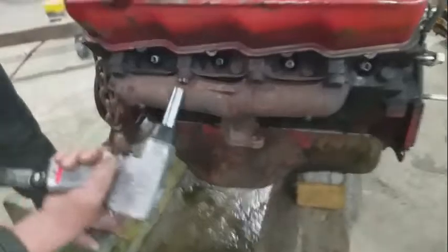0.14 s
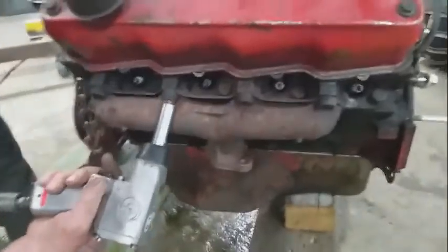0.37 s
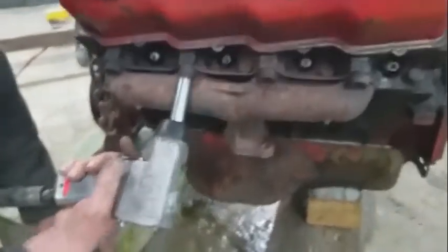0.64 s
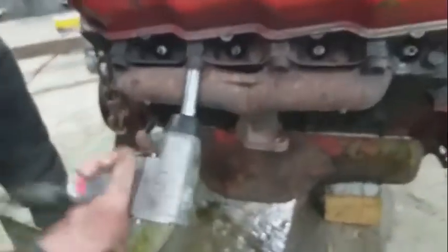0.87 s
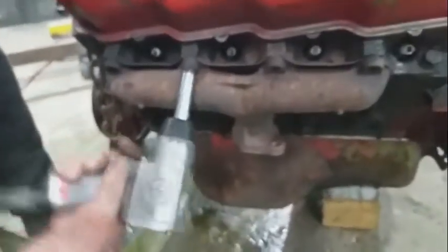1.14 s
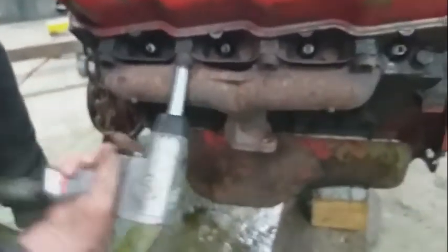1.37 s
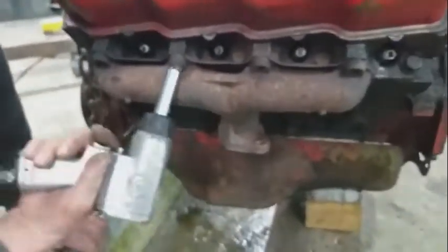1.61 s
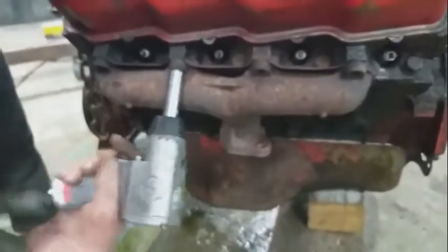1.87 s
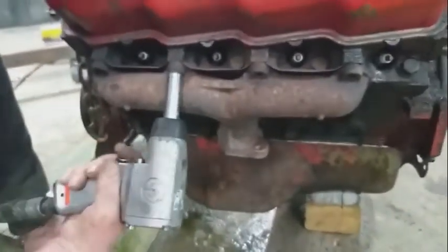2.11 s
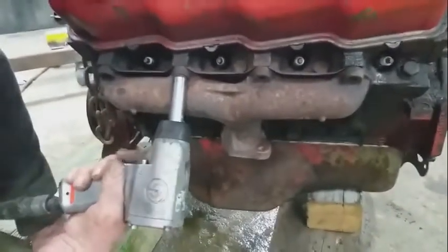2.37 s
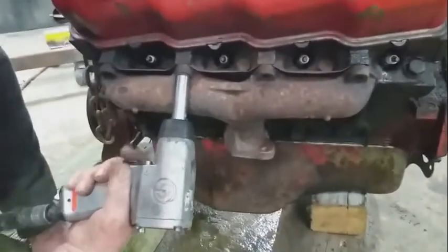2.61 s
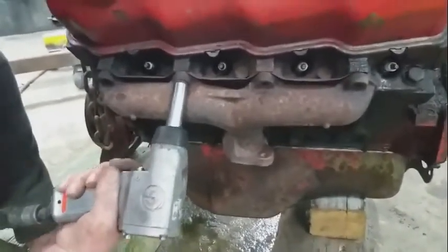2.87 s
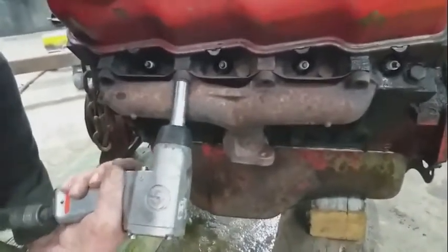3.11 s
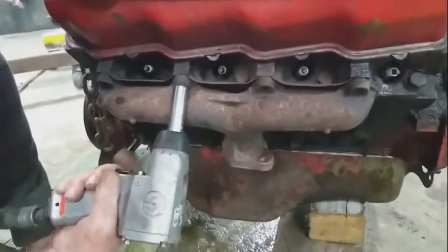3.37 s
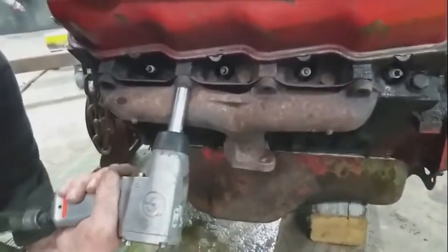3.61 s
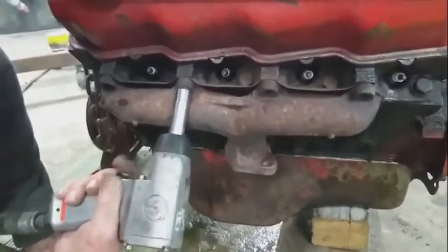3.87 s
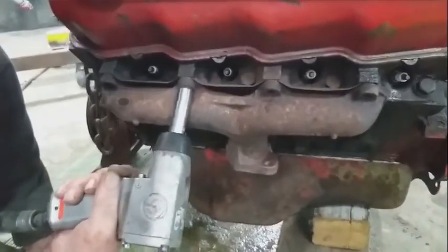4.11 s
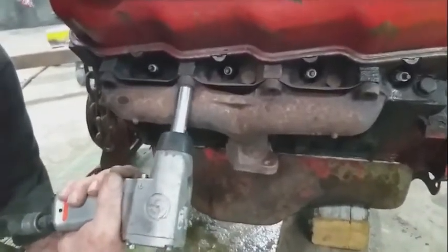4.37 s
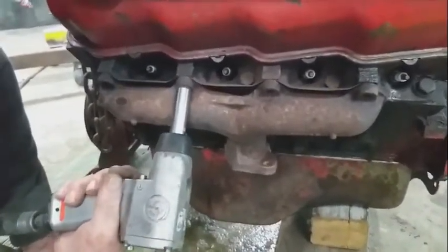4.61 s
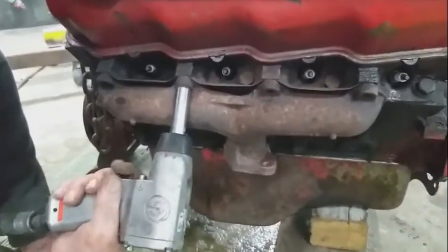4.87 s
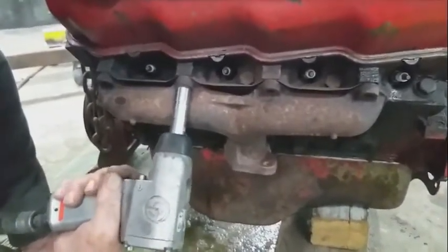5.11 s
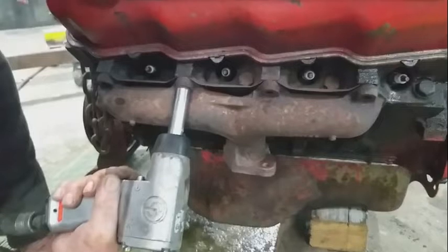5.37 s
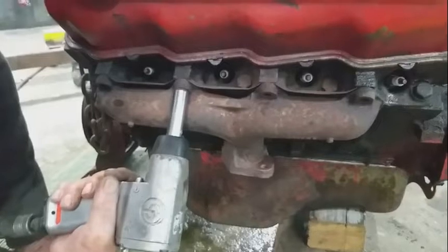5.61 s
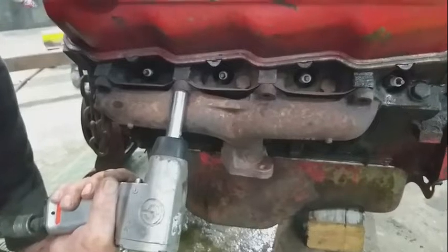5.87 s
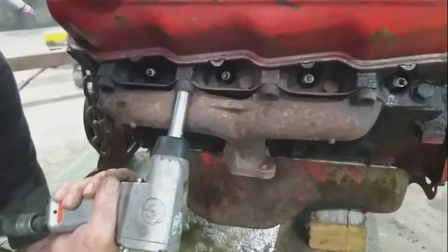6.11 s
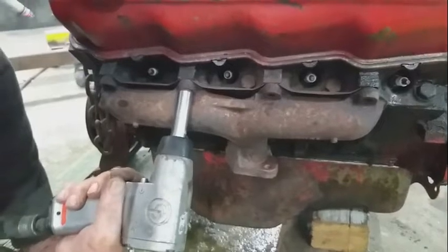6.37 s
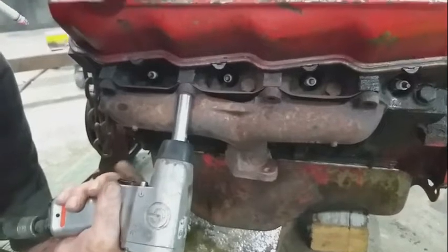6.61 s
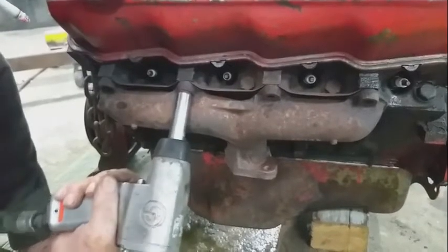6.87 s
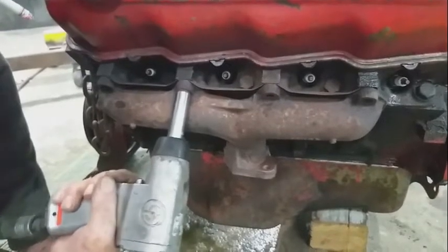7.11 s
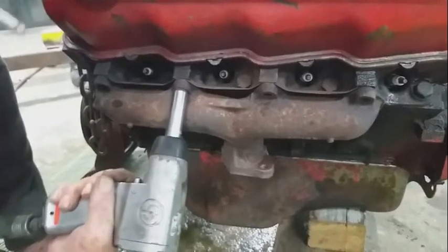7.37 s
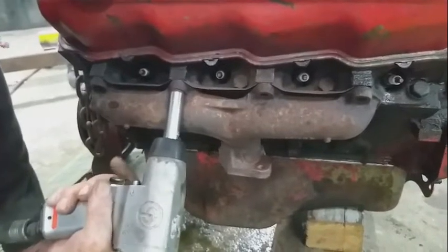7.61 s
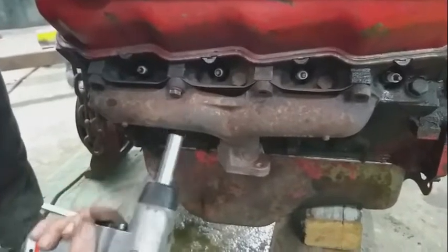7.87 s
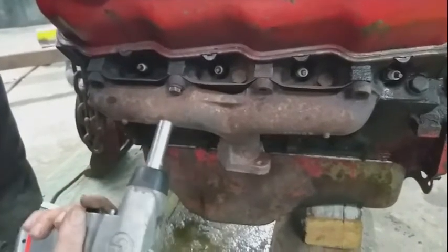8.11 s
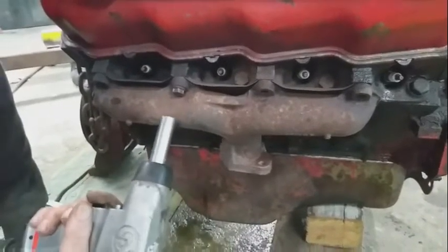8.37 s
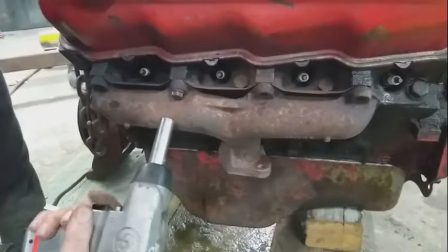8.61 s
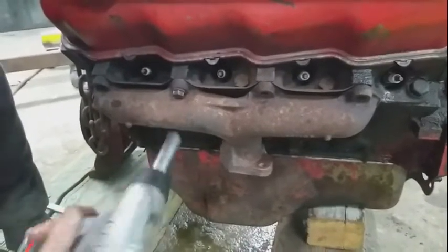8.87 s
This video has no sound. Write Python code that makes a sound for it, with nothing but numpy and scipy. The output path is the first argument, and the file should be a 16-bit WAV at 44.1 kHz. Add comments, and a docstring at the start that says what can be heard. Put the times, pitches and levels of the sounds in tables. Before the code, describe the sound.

Close to an engine block in a workshop, with narrow stereo and slight room echo, a faint leaking-air hiss runs throughout, gradually sinking and rising again at the end. From 0 to 1.2 seconds a steel socket knocks and scrapes grittily on iron, with faint hollow taps; another sharp clack comes at 1.8. A pneumatic impact wrench then fires six bursts: 2.4-2.7, 2.9-3.3, 3.5-3.9, 4.1-4.8, 5.0-6.5 and 6.75-7.55 seconds. Each is a bright roar of exhaust air with rapid, slightly uneven hammering, about twenty to thirty blows per second, thudding into iron and rattling ringing steel. Single socket clacks mark the pauses, including 3.4, 4.0, 4.8, 6.5 and 7.6. A light scrape follows at 7.8, then the unloaded motor flutters roughly from 8.1 to 8.6. A quiet dull scrape at 8.75 closes it near 9 seconds.

```python
"""An air impact wrench hammers in bursts on a seized bolt of an engine block in a workshop.
First the socket knocks and scrapes on the iron amid faint hollow taps; the level of a background hiss shifts.
Six trigger pulls follow: exhaust air roars, and each blow thuds into the iron and rattles the socket.
Socket knocks fall between pulls; then the unloaded motor creeps round, and a last dull scrape ends it.
Shaped noise makes the air; random grains drive ringing resonances for the steel, iron and housing."""
import sys
import numpy as np
from scipy import signal
from scipy.fft import rfft, irfft
from scipy.io import wavfile

SR = 44100
rng = np.random.default_rng(int(sys.argv[2]) if len(sys.argv) > 2 else 0)


def invert_db(x):
    """Field ratio 10**(x/20) for x, a level in decibels (scalar or array-like)."""
    u = np.asarray(x, float) / 20
    return 10 ** u


def waveform_to_disk(signal):
    """Save audio, clipped to [-1, 1], as 16-bit WAV at the path in sys.argv[1]."""
    frames = np.transpose(np.atleast_2d(signal))
    scaled = np.clip(frames, -1, 1) * 32767
    samples = np.round(scaled).astype(np.int16)
    wavfile.write(sys.argv[1], SR, samples)


N = 396459

# colour of the background hiss, like leaking air: (frequency [Hz], relative density [dB])
HISS_SPECTRUM = [(24, -60.5), (40, -33.5), (109, -10), (162, -12), (200, -19), (500, -28.5), (2100, -26),
                 (2930, -5), (3850, -16.5), (4370, -12), (4830, -18), (5330, -16.5), (7200, -16.5),
                 (9010, -6), (10500, -25), (15600, -11.5)]
# slow course of the background hiss as heard: (time [s], level [dB])
HISS_LEVEL = [(0, -44.5), (.6, -47.5), (1.2, -49.5), (1.7, -46), (2.1, -50), (2.9, -53), (5, -53.5),
              (6.7, -57.5), (8.65, -60.5), (8.8, -56), (8.99, -48.5)]
# how long the workshop rings: (frequency [Hz], time to fall by 60 dB [s])
SHOP_T60 = [(100, 0.29), (700, 0.51), (5000, 0.46), (13000, 0.32)]
# faint hollow taps: (time [s], relative level [dB])
TAPS = [(0.201, -21), (0.649, -37.5), (1.165, -44), (1.372, -59), (1.5, -58), (1.742, -45), (1.982, -48)]
# strokes of sliding and shuffling, each a curve: (time [s], relative level [dB], brightness [0-1])
SCRAPE_STROKES = [
    [(0, -57, 0.7), (.17, -63, 0.7), (.2, -44, 0.7), (.33, -37, 0.77), (.45, -36.5, 0.87), (.55, -52, .55),
     (.73, -57, 1)],
    [(.74, -38.5, 0.7), (.8, -46, 0.4), (.86, -38.5, 0.7), (.95, -40, 0.9), (1.05, -47.5, 0.6),
     (1.25, -77, .45)],
    [(2.28, -83, .45), (2.3, -48.5, 0.44), (2.44, -55, 0)],
    [(7.81, -68.5, 0.4), (7.825, -51.5, 0.97), (7.9, -60.5, 0.86), (8.1, -61, 0.3)],
    [(8.745, -72, 0.07), (8.762, -56, 0), (8.88, -58.5, 0.09), (8.99, -69, 0.2)],
]
# colour of dull sliding: (frequency [Hz], relative density [dB])
DULL_SCRAPE = [(120, -43), (200, -13), (488, -8.5), (572, -6.5), (660, -4), (2010, -11), (4910, -31),
               (9000, -11.5), (11700, -51.5), (19800, -120)]
# colour of bright sliding: (frequency [Hz], relative density [dB])
BRIGHT_SCRAPE = [(59, -48.5), (100, -10.5), (224, -15), (513, -23.5), (634, 0.5), (910, -17.5), (1870, 0),
                 (2630, -5.5), (8110, -10.5), (16000, -29)]
# resonances of the cast iron under a scrape: (frequency [Hz], width [Hz], relative level [dB])
IRON_MODES = [(653, 40, -3), (1060, 68, -11.5), (1314, 18, -0.5), (1540, 33, -4), (1877, 160, -4),
              (2250, 31, -6)]
# swell and fade of the unloaded motor: (time [s], relative level [dB])
CREEP_LEVEL = [(8.07, -61), (8.12, -45), (8.17, -35), (8.3, -35), (8.44, -36), (8.5, -41.5), (8.58, -48),
               (8.62, -68)]
# harder catches of the creeping motor: (time [s], relative level [dB])
CATCHES = [(8.1274, -36), (8.153, -30), (8.2018, -23.5), (8.2741, -29), (8.338, -28), (8.4002, -26.5),
           (8.4658, -31), (8.537, -28), (8.5744, -36)]
# resonances of the tool housing: (frequency [Hz], width [Hz], relative level [dB])
HOUSING_MODES = [(346.3, 80, -0.5), (1343, 120, -6.5), (2370, 166, -6), (3770, 69, -9), (4320, 83, -8),
                 (5600, 99, -21), (6200, 42, -9), (6760, 33, -8), (7600, 70, -13)]
# loose socket knocks:
# (time [s], relative level [dB], middle [dB to drive], thump [dB to drive], 60 dB die-away [s])
KNOCKS = [(0.184, -3.5, -29, -62, 0.021), (0.195, -7.5, -23.5, -60, 0.041), (0.333, -5, -16, -46, 0.033),
          (0.403, -10, -18, -46, 0.021), (0.637, -25.5, -35, -45, 0.082), (0.739, -25.5, -9, -38, 0.025),
          (1.775, -5, -23, -34.5, 0.064), (3.357, -8, -19, -45, 0.04), (3.962, -8.5, -19.5, -51, 0.03),
          (4.79, -15.5, -30.5, -46, 0.037), (6.497, -2.5, -22.5, -47, 0.026),
          (7.611, -4.5, -24, -51, 0.027)]
# resonances of socket, anvil and housing: (frequency [Hz], width [Hz], relative level [dB])
STEEL_MODES = [(3300, 93, -8), (3536, 95, -8.5), (4100, 46, 5), (4493, 63, 1), (5110, 86, -12),
               (5480, 29, 6.5), (5935, 26, 3), (6260, 77, 2), (6710, 90, 0.5), (7680, 210, -5),
               (7930, 100, -3), (8400, 70, -2.5), (8830, 290, -3.5)]
# trigger pulls: (air on [s], valve opening time [s], air off [s], relative exhaust level [dB])
PULLS = [(2.43, 0.025, 2.703, -12), (2.892, 0.03, 3.307, -13.5), (3.521, 0.027, 3.934, -14.5),
         (4.125, 0.026, 4.78, -15), (4.987, 0.027, 6.478, -14.5), (6.753, 0.034, 7.562, -15)]
# colour of the exhaust roar: (frequency [Hz], relative density [dB])
EXHAUST_SPECTRUM = [(35, -36), (60, -19.5), (344, -13.5), (522, -16.5), (1240, -20), (3860, -5), (4340, 2),
                    (4870, -3.5), (6600, -4), (9140, -12.5), (10000, -13), (12400, -8), (15600, -15)]
# hammering in each pull, slowing as the hose pressure sags, before jitter:
# (first blow [s], last blow [s], growth from gap to gap [ms])
HAMMERING = [(2.474, 2.679, 1.52), (2.939, 3.285, 0.17), (3.566, 3.928, 0.95), (4.164, 4.759, 0.17),
             (5.024, 6.466, .08), (6.793, 7.572, 0.25)]
# hammer blows in each pull: (count)
BLOWS_IN_PULL = [6, 9, 9, 14, 32, 18]


def rms_one(x):
    """Scale to unit rms."""
    return x / np.sqrt(np.mean(x ** 2) + 1e-20)


def in_time(rows, s):
    """Columns of a curve at times s."""
    at, *columns = np.transpose(rows)
    return [np.interp(s, at, column) for column in columns]


def at_hz(points, hz):
    """A table read on a log-frequency axis."""
    table_hz, values = np.transpose(points)
    return np.interp(np.log(hz + 1), np.log(table_hz), values)


def coloured(spectrum):
    """Noise with a given spectrum, rms 1."""
    hz = np.fft.rfftfreq(N, 1 / SR)
    white = rng.standard_normal(N)
    return rms_one(irfft(rfft(white) * invert_db(at_hz(spectrum, hz)), N))


def drift(rate):
    """Random wander: normal steps of spread 1, rate per second, joined by straight lines."""
    steps = rng.standard_normal(int(N / SR * rate) + 2)
    return np.interp(np.arange(N) * rate / SR, np.arange(len(steps)), steps)


def band(x, low_hz, high_hz):
    """Causal band-pass."""
    edges = [low_hz, min(high_hz, SR / 2.1)]
    sos = signal.butter(2, edges, "band", fs=SR, output="sos")
    return signal.sosfilt(sos, x + 1e-18)


def resonance(x, hz, width_hz):
    """Two-pole resonance with gain 1 on top."""
    r = np.exp(-np.pi * width_hz / SR)
    zeros = np.array([1, 0, -1]) * (1 - r * r) / 2
    poles = [1, -2 * r * np.cos(2 * np.pi * hz / SR), r * r]
    return signal.lfilter(zeros, poles, x + 1e-18)


def grains(per_s, spread_db):
    """Random clicks of uneven size, rms 1."""
    sizes = invert_db(spread_db * np.minimum(rng.exponential(1, N), 4))
    signs = rng.choice([-1, 1], N)
    return rms_one(sizes * signs * (rng.random(N) < per_s / SR))


def since(times):
    """Index of the latest event and seconds gone since it."""
    s = np.arange(N) / SR
    last = np.searchsorted(times, s, "right") - 1
    latest = np.maximum(last, 0)
    return latest, np.where(last < 0, 99, s - times[latest])      # 99 s: long silent


def body(drive, modes, last, vary_db):
    """Every event strikes each resonance with a strength of its own; signs alternate."""
    strengths = invert_db(vary_db * rng.standard_normal((last.max() + 1, len(modes))))
    out = np.zeros(N)
    for k, (hz, width_hz, db) in enumerate(modes):
        out += (-1) ** k * invert_db(db) * resonance(drive * strengths[last, k], hz, width_hz)
    return out


def background_hiss():
    """Background hiss, like leaking air: coloured noise following a level curve with a slight flutter."""
    level_db, = in_time(HISS_LEVEL, np.arange(N) / SR)
    return coloured(HISS_SPECTRUM) * invert_db(level_db + 1.0 * drift(14))


def shop(x):
    """Diffuse reverberation: octave bands of noise, each dying at its own rate."""
    s = np.arange(SR) / SR
    edges = 60 * 2. ** np.arange(9)
    tail = np.zeros(SR)
    for low, high in zip(edges, edges[1:]):
        t60 = at_hz(SHOP_T60, np.sqrt(low * high))
        tail += band(rng.standard_normal(SR), low, high) * invert_db(-60 * s / t60)
    tail *= s > .006      # nothing returns in the first 6 ms
    return signal.fftconvolve(x, tail / np.sqrt(np.sum(tail ** 2)))[:N]


def pings():
    """Small soft taps: short swells of noise ring one narrow hollow resonance."""
    hollow_hz, touch_s = 1007, 0.0094
    times, level_db = np.transpose(TAPS)
    last, age = since(times)
    swell = np.sin(np.pi * np.minimum(age / touch_s, 1))
    touch = rng.standard_normal(N) * invert_db(level_db[last] + 24.5) * swell
    return resonance(resonance(touch, hollow_hz, 300), hollow_hz, 24)


def scrapes():
    """Rough surfaces slide: grainy noise, duller or brighter, ringing the iron."""
    grit_db, ring_db = -2, -5
    s, out = np.arange(N) / SR, np.zeros(N)
    patch = (s * 12).astype(int)      # the iron rings with new mode strengths 12 times a second
    ring = body(grains(1500, 3.0), IRON_MODES, patch, vary_db=2.5)
    layers = coloured(DULL_SCRAPE), coloured(BRIGHT_SCRAPE), ring
    # equal strength in the middle range
    dull, bright, ring = [layer / band(layer, 400, 2500).std() for layer in layers]
    for rows in SCRAPE_STROKES:
        level_db, brightness = in_time(rows, s)
        brightness = np.clip(brightness, 0, 1)
        grit = np.sqrt(1 - brightness) * dull + np.sqrt(brightness) * bright
        sliding = (s > rows[0][0]) * (s < rows[-1][0])
        out += invert_db(level_db) * (invert_db(grit_db) * grit + invert_db(ring_db) * ring) * sliding
    return out * invert_db(1.8 * drift(160) + 2.0 * drift(40))


def creep():
    """The rotor turns slowly without load: uneven vane slaps ring the housing."""
    vanes_per_s, catch_s = 96, 0.0088      # the vane rate wanders around this
    s = np.arange(N) / SR
    turn = np.cumsum(vanes_per_s * invert_db(1.4 * drift(60))) / SR
    level_db, = in_time(CREEP_LEVEL, s)
    turning = (s > CREEP_LEVEL[0][0]) * (s < CREEP_LEVEL[-1][0])
    vanes = (0.45 + np.sin(np.pi * turn) ** 4) * invert_db(level_db + 2.0 * drift(90)) * turning

    times, catch_db = np.transpose(CATCHES)
    last, age = since(times)
    catches = invert_db(catch_db[last] - 7) * np.sin(np.pi * np.minimum(age / catch_s, 1))

    drive = grains(9000, 2.1) * (vanes + catches)
    slap = (np.clip(s - 8, 0, 1) * 40).astype(int)      # from 8 s on, new mode strengths 40 times a second
    ringing = invert_db(13.0) * body(drive, HOUSING_MODES, slap, vary_db=1.0)
    wide = invert_db(-4.5) * band(drive, 230, 10000)
    low = invert_db(2.0) * band(drive, 89, 320)
    high = invert_db(-2.5) * band(drive, 2990, 5570)
    return ringing + wide + low + high


def knocks():
    """The socket clacks on the bolt or drops back on the anvil: a crack, a dying ring and a thump."""
    times, level_db, middle_db, thump_db, die_s = np.transpose(KNOCKS)
    last, age = since(times)
    drive = grains(9700, 3.3) * invert_db(level_db[last] - 60 * age / np.maximum(die_s[last], .005))
    # the first contact is one sharp crack, decaying within a fraction of a millisecond
    crack = band(invert_db(level_db[last] + 7.5) * np.exp(-age / .0001), 3000, 14000)
    ringing = invert_db(0.5) * body(drive + invert_db(7.5) * crack, STEEL_MODES, last, vary_db=4.0)
    clatter = band(drive, 3420, 7840) + invert_db(-13.5) * band(drive, 8300, 16000)
    middle = invert_db(12.5) * band(drive * invert_db(middle_db[last]), 600, 2500)
    push = np.abs(drive) * invert_db(thump_db[last])      # the push goes one way
    thump = invert_db(38.5) * resonance(band(push, 130, 340), 165, 6.5)
    return ringing + crack + clatter + middle + thump


def blows():
    """Times and strengths of the hammer blows; before jitter, gaps grow evenly through each pull."""
    thud_db, thud_spread_db, rattle_db, rattle_spread_db = -20, 1.5, -12, 1
    fast_gap_s, fast_thud_db_per_ms = 0.0422, 1.64      # a hammer quicker than this thuds harder
    jitter_s, ms = .0015, .001
    times, gaps = [], []
    for (first, last, longer_ms), count in zip(HAMMERING, BLOWS_IN_PULL):
        k = np.arange(count)
        even = first + (last - first) * k / k[-1]
        run = even - longer_ms * ms * k * (k[-1] - k) / 2
        times.append(run)
        gaps.append(np.gradient(run))
    times, gaps = np.concatenate(times), np.concatenate(gaps)
    chance = rng.standard_normal((len(times), 3))
    haste_ms = np.maximum(fast_gap_s - gaps, 0) / ms
    thuds_db = thud_db + thud_spread_db * chance[:, 0] + fast_thud_db_per_ms * haste_ms
    rattles_db = rattle_db + rattle_spread_db * chance[:, 1]
    return times + jitter_s * chance[:, 2], thuds_db, rattles_db


def exhaust_flow(age):
    """Air let through by the trigger valve, dipping after each hammer blow."""
    bleed_db_per_s = 697
    s, flow_db = np.arange(N) / SR, np.full(N, -120.)
    for on, rise, off, db in PULLS:      # the valve opens gradually; pressure bleeds away after release
        opening_db = -45 * np.clip(1 - (s - on) / rise, 0, 2) ** 1.76
        bleed_db = bleed_db_per_s * np.maximum(s - off, 0)
        flow_db = np.maximum(flow_db, db + opening_db - bleed_db)
    # the rotor stalls after a blow, then regains speed
    stall = 1 - 0.37 * np.exp(-((age - .017) / 0.0075) ** 2)
    return invert_db(flow_db + 1.85 * drift(150)) * stall


def wrench():
    """Hammering tool: exhaust noise, grains rattling the steel and one push per blow for the thud."""
    times, thud_db, rattle_db = blows()
    last, age = since(times)
    flow = exhaust_flow(age)
    air = flow * coloured(EXHAUST_SPECTRUM) * invert_db(-0.5)

    # hammer and anvil rebound for a dozen ms
    rebound = np.exp(-(age / 0.016) ** 3) * (1 - .5 * np.exp(-age / 0.0048))
    chatter = invert_db(rattle_db[last]) * (rebound + 0.77 * np.exp(-age / 0.0012))
    drive = grains(6000, 3.9) * (chatter + invert_db(-5.0) * flow)
    steel = invert_db(9.0) * body(drive, STEEL_MODES, last, vary_db=2.0)
    # many small modes blur together
    clatter = invert_db(-9.5) * band(drive, 1700, 8800) + invert_db(-7.0) * band(drive, 4340, 8870)
    clatter += invert_db(-20) * band(drive, 10500, 16000)

    push = age / 0.0016 * np.exp(-age / 0.0029) + 0.5 * np.exp(-age / 0.0023)
    jolts = grains(6000, 0.89) * invert_db(thud_db[last]) * push
    thud = invert_db(17.0) * band(jolts, 47, 308) + invert_db(12) * band(jolts, 170, 2400)

    # the low housing modes hum along
    housing = invert_db(-3.5) * body(drive + invert_db(16.5) * jolts, HOUSING_MODES[:3], last, vary_db=0.5)
    housing += invert_db(-2) * resonance(drive, 2334, 80)
    return air + steel + clatter + thud + housing


def scene():
    """Tool, knocks and taps with their room echo, plus dry scrapes and hiss, in narrow stereo."""
    near = wrench() + knocks() + creep() + pings()
    mid = near + invert_db(-16.5) * shop(near) + scrapes() + background_hiss()
    # two close microphone ports differ only around their two resonances
    late = np.roll(mid, shift=4)
    low_side = invert_db(-19.5) * band(band(late, 1500, 2500), 1000, 3000)
    side = low_side + invert_db(-15.0) * band(late, 8840, 10340)
    return np.array([mid + side, mid - side])


def low_pass(x):
    """Removes everything above the highest recorded frequency."""
    return signal.sosfilt(signal.butter(12, 16990, fs=SR, output="sos"), x)


def record(dry):
    """Peaks are rounded softly, then the top is cut steeply above 15750 Hz."""
    rounded = 1.109 * np.tanh(dry / 1.081)
    cut = signal.ellip(10, .5, 80, 15750, fs=SR, output="sos")
    mix = signal.sosfilt(cut, rounded)
    return low_pass(mix)


dry = scene()
out = record(dry)
waveform_to_disk(out)
```